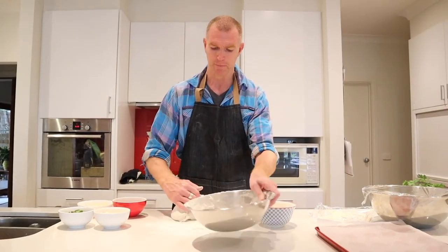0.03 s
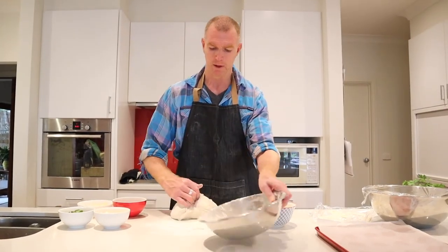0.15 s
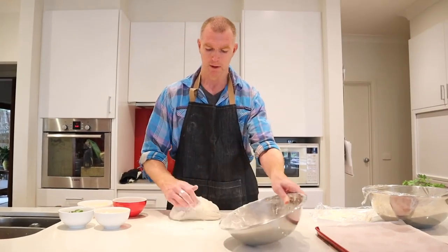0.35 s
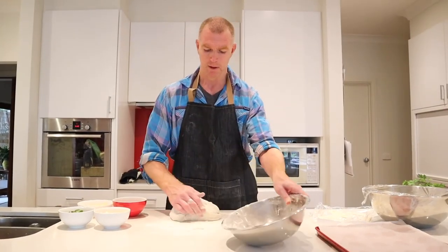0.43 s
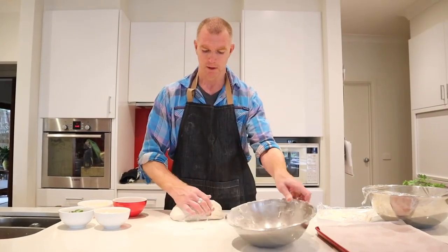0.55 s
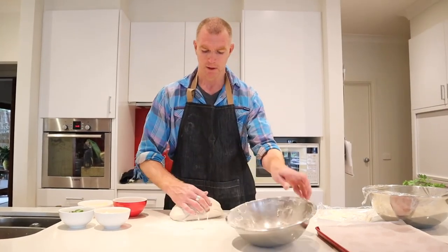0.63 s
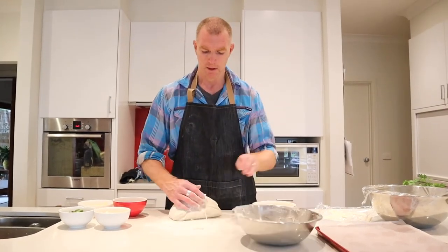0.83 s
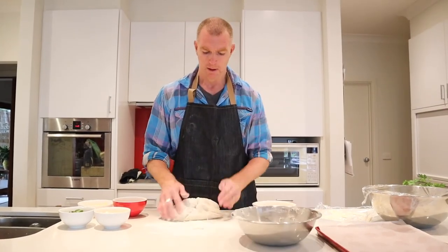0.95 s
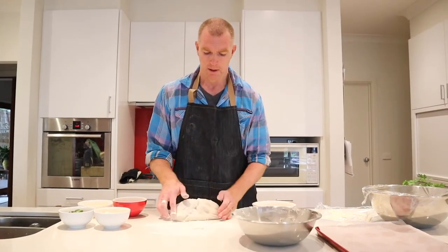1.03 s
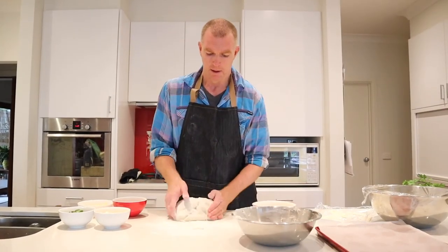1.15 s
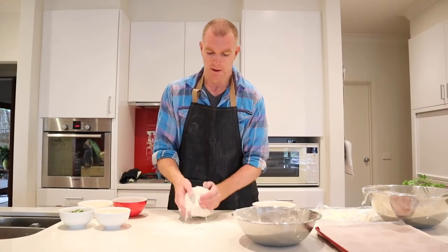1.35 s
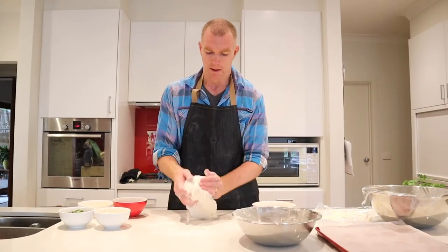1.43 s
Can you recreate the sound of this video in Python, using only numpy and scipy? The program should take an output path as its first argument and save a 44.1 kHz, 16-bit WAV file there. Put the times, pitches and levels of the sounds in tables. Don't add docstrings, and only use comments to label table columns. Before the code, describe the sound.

Metal bowl clatter on a hard kitchen benchtop: hollow ringing bounces quicken to rest, a damped landing follows, then loud knocks and a short rolling wobble, with tiny dough ticks, room echo and faint fridge hum, heard close in stereo.

```python
import sys
import numpy as np
from scipy import signal
from scipy.fft import rfft, irfft
from scipy.io import wavfile
from scipy.ndimage import uniform_filter1d

SR = 44100
rng = np.random.default_rng(int(sys.argv[2]) if len(sys.argv) > 2 else 0)


def wrap_up_sound(samples):
    columns = np.atleast_2d(samples).T
    tamed = np.clip(columns, -1, 1)
    steps = np.round(tamed * 32767).astype(np.int16)
    wavfile.write(sys.argv[1], SR, steps)


def voltage_ratio(decibels):
    exponent = np.asarray(decibels, float) / 20
    return 10 ** exponent


N = 66150


def rms_one(x):
    return x / np.sqrt(np.mean(x ** 2) + 1e-20)


def at_hz(points, hz):
    table_hz, value = np.transpose(points)
    return np.interp(np.log(hz), np.log(table_hz), value)


def butter(x, order, hz, kind="low"):
    return signal.sosfilt(signal.butter(order, hz, kind, fs=SR, output="sos"), x)


def drift(hz):
    r = np.exp(-2 * np.pi * hz / SR)
    return rms_one(signal.lfilter([1], [1, -2 * r, r * r], rng.standard_normal(N + SR))[SR:])


def ring(clicks, hz, t60_s):
    r, w = voltage_ratio(-60 / (t60_s * SR)), 2 * np.pi * hz / SR
    return signal.lfilter([0, np.sin(w)], [1, -2 * r * np.cos(w), r * r], clicks + 1e-18)


def bloom(clicks, hz, t60_s):
    swell_t60_s, long_above_s = .03, .095
    if t60_s > long_above_s:
        clicks = ring(clicks, hz, swell_t60_s) * 2 * np.log(1000) / (swell_t60_s * SR)
    return ring(clicks, hz, t60_s)


def train(start_s, gains, rebound_db):
    rebound_s = .0027
    out = np.zeros(N)
    np.add.at(out, (start_s * SR).astype(int), gains)
    np.add.at(out, ((start_s + rebound_s) * SR).astype(int), gains * voltage_ratio(rebound_db))
    return out


def wall_modes(hits, modes, modes_db, places, place_db, roll, sharp_share):
    start_s, peak_db, crack_db, _, rebound_db = np.transpose(hits)
    spread_db = 1.5 * rng.standard_normal((len(start_s), len(modes)))
    rocking_depth_per_s, rocking_hz = 2.2, 12
    bright_from_hz, sharp_above_hz, contact_hz = 2500, 1400, 2120
    low, high = np.zeros(N), np.zeros(N)
    for k, ((hz, t60_s), mode_db) in enumerate(zip(modes, modes_db)):
        knock_db = peak_db + mode_db - 7 + spread_db[:, k]
        knock_db = knock_db + place_db * np.cos((k + 2) * np.array(places))
        if hz > sharp_above_hz:
            knock_db = knock_db + sharp_share * crack_db
        again_db = rebound_db - 60 * (hz < bright_from_hz)
        clicks = train(start_s, voltage_ratio(knock_db), again_db) + voltage_ratio(mode_db) * roll
        tone = bloom(clicks, hz, t60_s) * (1 + rocking_depth_per_s * t60_s * drift(rocking_hz))
        if hz < bright_from_hz:
            low += tone
        else:
            high += tone
    return high + butter(low, 2, contact_hz)


def cracks(hits, roll):
    # frequency in Hz, level in dB per Hz.
    crack_colour = [(120, 3.5), (300, 6.5), (800, 6), (1300, -3), (1700, -6), (3600, -9.5), (5300, -5.5),
                    (14000, -13.5)]
    start_s, peak_db, crack_db, _, rebound_db = np.transpose(hits)
    level_db, t60_s = -6.5, .012
    light_below_db, light_top_hz, scuff_top_hz = -9.9, 6500, 5700
    f_hz = np.maximum(np.fft.rfftfreq(N, 1 / SR), 20)
    grit = rms_one(irfft(rfft(rng.standard_normal(N)) * voltage_ratio(at_hz(crack_colour, f_hz)), N))

    def burst(clicks):
        return grit * signal.lfilter([1], [1, -voltage_ratio(-60 / (t60_s * SR))], clicks + 1e-18)

    gains = voltage_ratio(peak_db + crack_db + level_db)
    hard = burst(train(start_s, gains * (peak_db > light_below_db), rebound_db))
    light = burst(train(start_s, gains * (peak_db <= light_below_db), rebound_db))
    scuff = burst(1.6 * np.abs(roll) + np.zeros(N))
    return hard + butter(light, 4, light_top_hz) + butter(scuff, 4, scuff_top_hz)


def thumps(hits):
    start_s, peak_db, _, thump_db, rebound_db = np.transpose(hits)
    hz, level_db, t60_s = 189, -20, 0.034
    return ring(train(start_s, voltage_ratio(peak_db + thump_db + level_db), rebound_db), hz, t60_s)


def bowl(hits, modes, modes_db, places, place_db, roll=0, sharp_share=0):
    out = wall_modes(hits, modes, modes_db, places, place_db, roll, sharp_share)
    out = out + cracks(hits, roll) + thumps(hits)
    return butter(out, 4, 119.6, "high")


def edge_bounces():
    # start in seconds, peak in dB, crack in dB, thump in dB, rebound in dB.
    edge_hits = [
        (.2261, -7, -4, 14.5, 5),
        (.3262, -5, -5, -18, 1.5),
        (.382, -8, -0.5, 6, 0.5),
        (.421, -8, -9, -4, -14),
        (.4527, -15, -5.5, 14, -1.5),
        (.4772, -12.5, -7, 0, -2.5),
        (.496, -17, -27, 21, 0),
        (.5115, -24.5, -1.5, -9, -25),
        (.523, -34, -14, -22, -4),
        (.533, -48, -3, -23, 18),
    ]
    # mode frequency in Hz, decay T60 in seconds.
    edge_modes = [(215, 0.037), (290, 0.02), (352, 0.046), (460, 0.078), (531, 0.21), (830, 0.038),
                  (1313, 0.118), (1620, 0.18), (1911, 0.22), (2900, .03), (4550, 0.036), (4950, 0.011),
                  (5335, 0.012), (5750, .02)]
    edge_db = [-23, -29, -4.5, -7.5, -6, -10.5, -15, -18.5, -27.5, -23.5, -20, -8.5, -3, -24]
    edge_places = [.1, .2, .3, .4, .5, .6, .7, .8, .9, 1.1]
    return bowl(edge_hits, edge_modes, edge_db, edge_places, place_db=1.5)


def landing():
    # start in seconds, peak in dB, crack in dB, thump in dB, rebound in dB.
    landing_hits = [
        (.7178, -5.5, -2, 10.5, 7),
        (.737, -25.5, 8, -6, -6),
        (.763, -30, -12, 0, 10),
        (.785, -13, -34, -7, 2),
        (.81, -21, -19, 6, -25),
    ]
    # mode frequency in Hz, decay T60 in seconds.
    landing_modes = [(190, .07), (269, .08), (404, .08), (528, .18), (745, .08), (800, .16), (996, .08),
                     (1350, .03), (1430, .08), (1604, .06), (1895, .1), (2380, .02), (3060, .018),
                     (4900, .012)]
    landing_db = [-8, -16.5, -14.5, -12, -5.5, -19, -7.5, -7, -13.5, -40, -13.5, -32, -13.5, -10]
    landing_places = [.1, .4, .7, 1.1, 1.4]
    return bowl(landing_hits, landing_modes, landing_db, landing_places, place_db=5)


def flat_wobble():
    # start in seconds, peak in dB, crack in dB, thump in dB, rebound in dB.
    flat_hits = [
        (.8598, -7.5, 5, 17, 3),
        (.9068, -4.5, 6, -13, -8.5),
        (.931, -10.5, -9, -26, -22),
        (.943, -10.5, -10, 5, 11.5),
        (.960, -21, 0, 9, 1),
        (.981, -18, 3.5, -5, -20),
        (1.003, -16, -3.5, -2, -6),
        (1.022, -21, 5.5, -11, -14),
        (1.11, -52, -5, -4, -12),
    ]
    # mode frequency in Hz, decay T60 in seconds.
    flat_modes = [(176, 0.065), (250, 0.027), (507.5, 0.18), (513, .14), (738, 0.29), (789.5, 0.16),
                  (980, 0.075), (1456, 0.079), (1623.5, 0.23), (1588, 0.019), (2370, 0.17), (3166, 0.07),
                  (2833, 0.017), (5340, 0.032)]
    flat_db = [-13, -6, -11, -16, -11.5, -8.5, -26, -13, -11, 1, -18, -15.5, -8, -12]
    flat_places = [.86, .6, .55, .1, 1.6, 2.6, .6, 1.2, .2]
    return bowl(flat_hits, flat_modes, flat_db, flat_places, place_db=5, roll=rolling(), sharp_share=.7)


def rolling():
    # time in seconds, level in dB.
    roll_level = [(0.722, -37), (.76, -35), (0.839, -52.5), (.9, -47), (.96, -28.5), (1.026, -42),
                  (1.08, -83), (1.12, -76)]
    contacts_per_s, spread_db = 450, 3.5
    level_db = np.interp(np.arange(N) / SR, *np.transpose(roll_level), left=-120, right=-120)
    contacts = (rng.random(N) < contacts_per_s / SR) * rng.choice([-1, 1], N)
    return contacts * voltage_ratio(level_db + spread_db * rng.standard_normal(N))


def dough():
    # start in seconds, peak in dB.
    peel_ticks = [
        (0.0567, -36.5),
        (.822, -29),
        (1.37, -51),
    ]
    # start in seconds, length in seconds, level in dB, centre in Hz.
    slide_rubs = [
        (0.2, 0.031, -57, 2750),
        (1.28, 0.22, -62, 4300),
        (1.316, 0.047, -47, 201),
    ]
    tick_hz, tick_t60_s = 9560, 0.0026
    clicks, t_s = np.zeros(N), np.arange(N) / SR
    for start_s, peak_db in peel_ticks:
        clicks[int(start_s * SR)] = voltage_ratio(peak_db + 2.5)
    out = ring(clicks, tick_hz, tick_t60_s)
    for start_s, length_s, level_db, hz in slide_rubs:
        noise = rms_one(butter(rng.standard_normal(N), 2, [hz / 1.5, hz * 1.5], "band"))
        out = out + voltage_ratio(level_db) * noise * np.sin(np.pi * np.clip((t_s - start_s) / length_s, 0, 1))
    return out


def place(x, lag_samples, pan_db):
    n = np.arange(N)
    left = np.interp(n - 4 - lag_samples / 2, n, x) * voltage_ratio(pan_db / 2)
    right = np.interp(n - 4 + lag_samples / 2, n, x) * voltage_ratio(-pan_db / 2)
    return np.array([left, right])


def bands(gain):
    # frequency in Hz, correlation from -1 to 1.
    likeness = [(100, 1), (300, 0.97), (700, 0.57), (1500, 0.26), (4000, -0.6), (7000, -0.69),
                (10000, -0.54)]
    edges_hz = 24 * 2 ** np.arange(0, 9.6, .5)
    white = rng.standard_normal((2, 2, N))
    out = 0
    for k, (low_hz, high_hz) in enumerate(zip(edges_hz, edges_hz[1:])):
        mid, side = butter(white[k % 2], 2, [low_hz, high_hz], "band")
        hz = np.sqrt(low_hz * high_hz)
        alike = np.clip(at_hz(likeness, hz), -1, 1)
        out = out + gain(hz) * (np.sqrt(1 + alike) * mid + np.sqrt(1 - alike) * side * [[1], [-1]])
    return butter(out, 6, 12850)


def kitchen(x):
    # frequency in Hz, decay T60 in seconds.
    room_t60 = [(100, 0.56), (500, 0.55), (1500, 0.59), (4000, 0.6), (10000, 0.41)]
    # frequency in Hz, level in dB.
    room_colour = [(100, 7.5), (500, 5.5), (1500, 6.5), (3000, 0.5), (5000, 2), (10000, 4), (14000, -32)]
    level_db, rise_s = -3, 0.0013
    t_s = np.arange(N) / SR
    tail = bands(lambda hz: voltage_ratio(at_hz(room_colour, hz) - 60 * t_s / at_hz(room_t60, hz)))
    tail = tail * (1 - np.exp(-t_s / rise_s))
    tail = tail / np.sqrt(np.sum(tail ** 2) / 2)
    return voltage_ratio(level_db) * signal.fftconvolve(x[None], tail, axes=1)[:, :N]


def fridge():
    # frequency in Hz, rms level in dB, width in Hz.
    hum_lines = [(145, -56.5, 5.6), (179.8, -62.5, 2), (216, -59.5, 1.7), (256, -80, 1.6)]
    # frequency in Hz, level in dB per Hz.
    air_colour = [(30, -9), (60, 0), (130, -17), (300, -10), (600, -16.5), (2000, -22.5), (9000, -32),
                  (14000, -27)]
    motor_hz, motor_db, motor_sway, air_db = 90.36, -44.5, 0.46, -53.5
    hum = np.zeros(N)
    for hz, level_db, width_hz in hum_lines:
        line = ring(rng.standard_normal(2 * N), hz, 0.89 / width_hz)[N:]
        hum += voltage_ratio(level_db) * rms_one(line)
    phase = 2 * np.pi * motor_hz * np.arange(N) / SR + 0.35 * drift(4.4)
    motor = voltage_ratio(motor_db) * (1 + motor_sway * drift(3.4)) * np.sin(phase)
    air = voltage_ratio(air_db) * rms_one(bands(lambda hz: voltage_ratio(at_hz(air_colour, hz))))
    return hum + motor + air


def scene():
    edge, flat, soft = edge_bounces(), flat_wobble() + landing(), dough()
    near = place(edge, 0.75, 1) + place(flat, 1.15, -1) + place(soft, 0.03, 2.3)
    echo_s, echo_db = .0075, -9.5
    near = near + voltage_ratio(echo_db) * np.roll(near, int(echo_s * SR), axis=1)
    return near + kitchen(edge + flat + soft) + fridge()


def band_limit(x):
    return signal.sosfilt(signal.butter(12, 16190, fs=SR, output="sos"), x)


def record(dry):
    knee_db, squeeze, release_db_per_s = -32, 0.25, 110
    ceiling, cutoff_hz, mic_top_hz = 0.9, 16200, 15700
    ramp_db = release_db_per_s * np.arange(N) / SR
    level_db = 10 * np.log10(uniform_filter1d(np.mean(dry ** 2, axis=0), size=128) + 1e-12)
    held_db = np.maximum.accumulate(level_db + ramp_db) - ramp_db
    over_db = np.maximum(held_db - knee_db, 0)
    gain = voltage_ratio(-squeeze * signal.lfilter([.01], [1, -.99], over_db))
    x = ceiling * np.tanh(dry * gain / ceiling)
    x = signal.sosfilt(signal.cheby2(10, 60, cutoff_hz, fs=SR, output="sos"), x)
    return band_limit(butter(x, 2, mic_top_hz))


dry = scene()
out = record(dry)
wrap_up_sound(out)
```